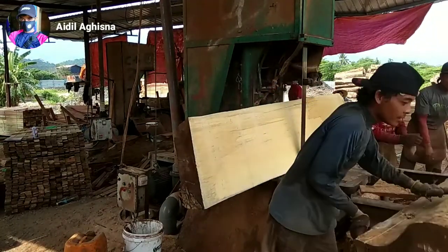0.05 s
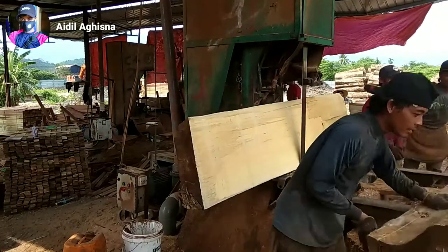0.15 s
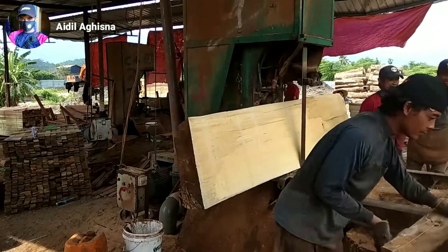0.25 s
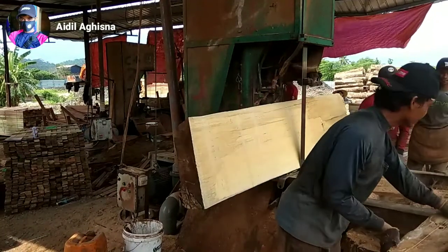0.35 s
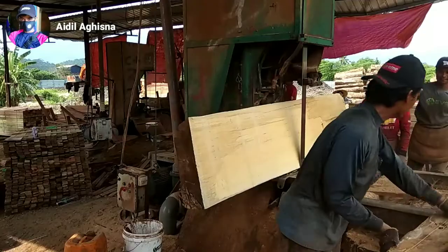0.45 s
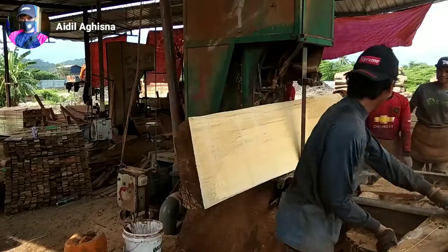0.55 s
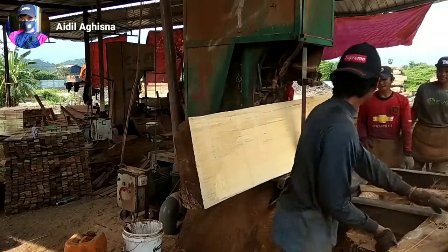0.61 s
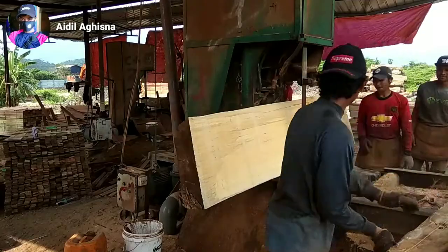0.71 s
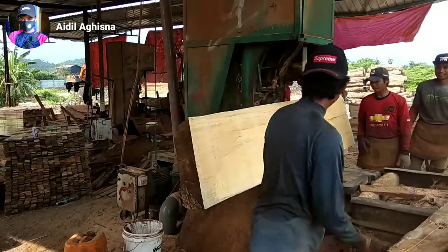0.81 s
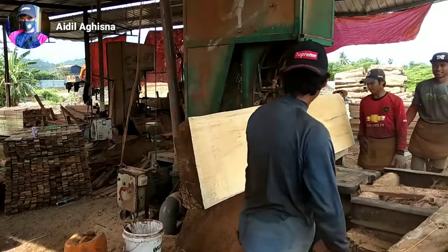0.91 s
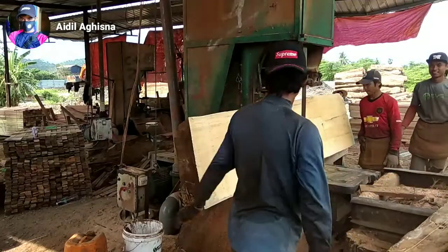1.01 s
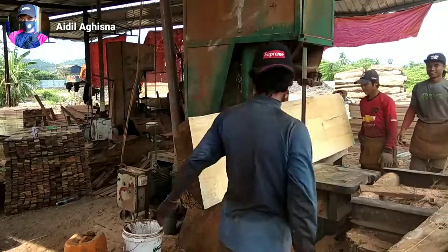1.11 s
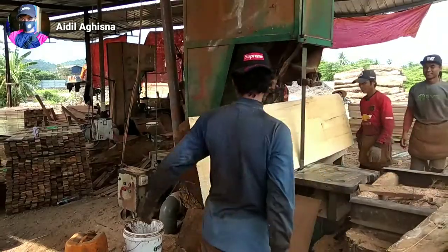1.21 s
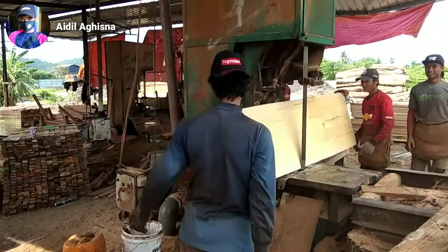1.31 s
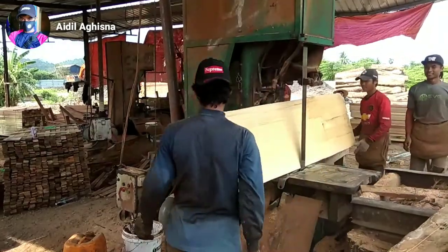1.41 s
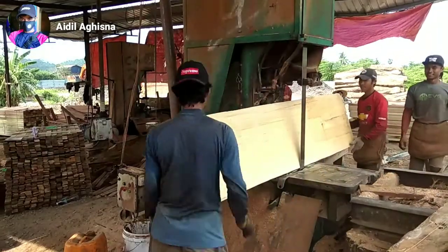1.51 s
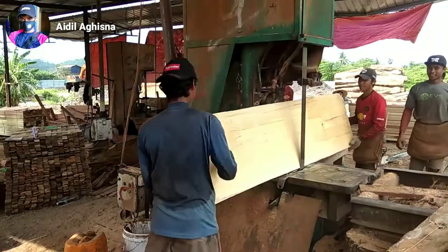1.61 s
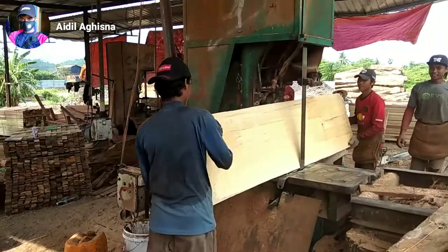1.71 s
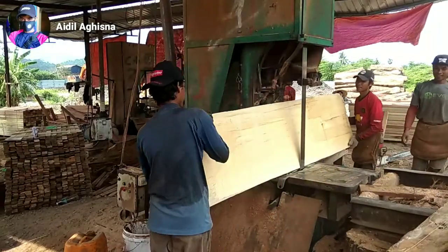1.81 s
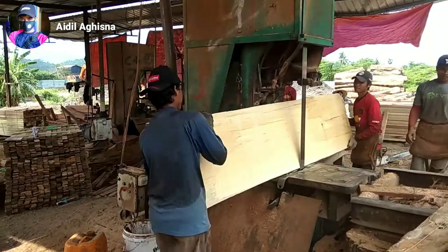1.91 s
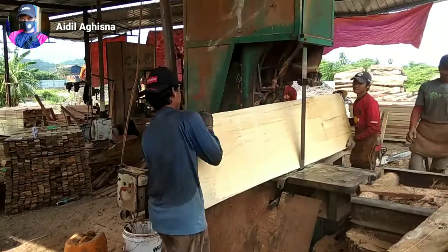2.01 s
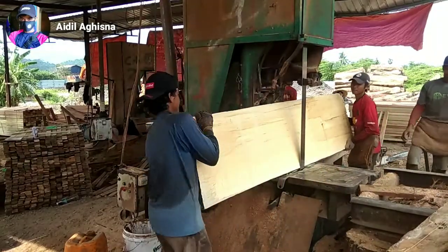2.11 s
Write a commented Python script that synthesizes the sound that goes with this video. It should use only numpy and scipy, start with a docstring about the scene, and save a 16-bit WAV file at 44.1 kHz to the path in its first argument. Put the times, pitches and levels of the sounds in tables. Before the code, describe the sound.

A heavy, muffled thud of a thick board landing and rocking, just after a light wooden knock and brief edge scrape; short shed echo, then faint steady hum, airy hiss and thin squeaks, picked up by a modest microphone.

```python
"""Board landing in a humming sawmill shed

A machine hums near one pitch (sine plus octave) over a faint rush of air and a high hiss (shaped noise).
A board's end knocks lightly; then a thick board drags an edge (noise), thuds and rocks (decaying modes).
Wall echoes and a diffuse shed tail answer the wood. Thin squeaks (wandering sines) come and go, then very
faint high sine tones near 14 kHz. The recorder's gain ducks under loud peaks."""
import sys
import numpy as np
from scipy import signal
from scipy.fft import rfft, irfft, next_fast_len
from scipy.io import wavfile
from scipy.ndimage import uniform_filter1d, map_coordinates

SR = 44100
rng = np.random.default_rng(int(sys.argv[2]) if len(sys.argv) > 2 else 0)


def int16_out(signal):
    """Quantize to a 16-bit WAV file."""
    q = np.round(np.clip(np.atleast_2d(signal).T, -1, 1) * 32767)
    wavfile.write(sys.argv[1], SR, q.astype(np.int16))


N = 97020
TIME_S = np.arange(N) / SR


def amp(db):
    """Decibels to gain."""
    return 10 ** (np.asarray(db) / 20)


def unit(x):
    """Scale to rms 1."""
    return x / np.sqrt(np.mean(x ** 2) + 1e-20)


def along(points, hz):
    """Interpolate (frequency, value) points on a log-frequency axis."""
    point_hz, value = np.transpose(points)
    return np.interp(np.log(hz + 1), np.log(point_hz + 1), value)


def wobble(knots_per_s):
    """Smooth random curve: a spline through normal random knots."""
    knots = rng.standard_normal(int(N * knots_per_s / SR) + 4)
    return map_coordinates(knots, [TIME_S * knots_per_s])


def filtered(x, response):
    """Multiply the spectrum of x by a response of frequency."""
    size = next_fast_len(N + SR // 2)
    spectrum = rfft(x, size) * response(np.fft.rfftfreq(size, 1 / SR))
    return irfft(spectrum, size)[..., :N]


def stereo(mid, side):
    """Left and right from mid and side."""
    return np.array([mid + side, mid - side])


def decay(t, t60_s):
    """Exponential decay, 60 dB down at t60_s."""
    return np.exp(-np.log(1000) * t / t60_s)


# hum level: time_s, level_db
HUM_LEVEL = [(0, -59), (.8, -59), (1.2, -59.5), (1.45, -62.5), (2.2, -62.5)]
HUM_HZ, HUM_DRIFT_HZ, HUM_FLUTTER_DB = 418.4, 0.25, 0.2
OCTAVE_DB, HUM_SIDE_DB = -14, -16.5


def hum():
    """Machine tone with a weak octave; slight pitch drift and level flutter, quadrature side signal."""
    phase = 2 * np.pi * np.cumsum(HUM_HZ + HUM_DRIFT_HZ * wobble(4.13)) / SR
    level_db = np.interp(TIME_S, *np.transpose(HUM_LEVEL)) + HUM_FLUTTER_DB * wobble(11.95)
    mid = np.sin(phase) + amp(OCTAVE_DB) * np.sin(2 * phase)
    side = amp(HUM_SIDE_DB) * np.cos(phase)
    return amp(level_db) * np.sqrt(2) * stereo(mid, side)


# left-right likeness of the noise: frequency_hz, correlation
LIKENESS = [(40, 0.034), (300, 0.53), (1200, 0.48), (3000, 0.23), (8000, -0.26), (13000, 0.045)]


def rush(spectrum, patchy_db):
    """Stereo noise, rms 1: random gain patches in time and frequency, then spectrum and width."""
    z = signal.stft(rng.standard_normal((2, N)), nperseg=512)[2]
    patches = uniform_filter1d(rng.standard_normal(z.shape[1:]), size=5, axis=0)
    patches = uniform_filter1d(patches, size=10, axis=1)
    pair = signal.istft(z * amp(patchy_db * unit(patches)), nperseg=512)[1][:, :N]

    def mid_side_response(hz):
        angle = np.arccos(np.clip(along(LIKENESS, hz), -1, 1)) / 2
        return amp(along(spectrum, hz)) * [np.cos(angle), np.sin(angle)]

    return unit(stereo(*filtered(pair, mid_side_response)))


# air spectrum: frequency_hz, relative_density_db
AIR_SPECTRUM = [(25, -5), (68, 3.5), (130, -6), (230, -7), (320, -7), (480, -11), (700, -8), (900, -13),
                (1080, -1.5), (1500, -8.5), (2000, -10.5), (3200, -10), (4500, -16.5), (7000, -42)]
AIR_DB = -57


def air():
    """Faint broadband rush, lightly patchy."""
    return amp(AIR_DB) * rush(AIR_SPECTRUM, patchy_db=1)


# hiss spectrum: frequency_hz, relative_density_db
HISS_SPECTRUM = [(3000, -55), (4600, -18), (5400, -8.5), (7000, -9.5), (8600, -4.5), (10200, 1),
                 (12500, 0.5), (14500, -3.5), (15500, -9.5)]
HISS_DB = -49


def hiss():
    """High noise with stronger patches."""
    return amp(HISS_DB) * rush(HISS_SPECTRUM, patchy_db=2.46)


PIVOT_HZ, BUILD_CYCLES = 281, 0.85  # brightness tilt centre; build-up of each mode


def strike(modes, start_s, bright_db_per_octave):
    """One soft contact: each mode builds up over about a cycle and dies at its own rate."""
    t = np.maximum(TIME_S - start_s, 0)
    out = np.zeros(N)
    for hz, level_db, t60_s in modes:
        gain = amp(level_db + bright_db_per_octave * np.log2(hz / PIVOT_HZ))
        build = 1 - np.exp(-(t * hz / BUILD_CYCLES) ** 2)
        out += gain * decay(t, t60_s) * build * np.sin(2 * np.pi * hz * t)
    return out


# modes of the board's end: frequency_hz, relative_level_db, t60_s
END_MODES = [(574, -14, 0.033), (641, 1, 0.056), (675, -17, 0.017)]
# knock and rebounds: start_s, relative_level_db
END_KNOCKS = [(0.0, -38), (.028, -44), (.062, -46), (.11, -51)]


def knock():
    """A board's end knocks and rebounds, ringing its modes at each contact."""
    return sum(amp(level_db) * strike(END_MODES, start_s, 0) for start_s, level_db in END_KNOCKS)


# side echo colour: frequency_hz, gain_db
ECHO_COLOUR = [(70, -20), (150, -6), (300, 1), (700, 7)]
WALL_COUNT, WALL_SPREAD_S, WALL_DB = 10, 0.035, -8.5


def walls(x):
    """Early echoes off machines and timber stacks: side-only delays of alternating sign."""
    delays_s = rng.uniform(0, WALL_SPREAD_S, WALL_COUNT)

    def response(hz):
        echoes = sum((-1) ** k * np.exp(-2j * np.pi * hz * d) for k, d in enumerate(delays_s))
        return amp(along(ECHO_COLOUR, hz)) * echoes

    return stereo(0, amp(WALL_DB) * filtered(x, response) / np.sqrt(WALL_COUNT))


# shed decay: frequency_hz, t60_s
SHED_DECAY = [(80, 0.36), (200, 0.47), (400, .5), (750, 0.7)]
# shed tail colour: frequency_hz, gain_db
TAIL_COLOUR = [(60, 6), (100, 0), (145, -8.5), (220, 3.5), (330, -5.5), (420, 11.5), (500, 0), (590, 0.5),
               (680, -5.5), (780, 4)]
SHED_DB, SHED_DELAY_S, SHED_WIDTH_DB = -9.5, 0.018, -5.5


def shed(x):
    """Diffuse shed answer: convolution with noise whose decay depends on frequency."""
    hz, t, z = signal.stft(rng.standard_normal((2, SR)), SR, nperseg=512)
    tail = signal.istft(z * decay(t, along(SHED_DECAY, hz)[:, None]), SR, nperseg=512)[1]
    tail = tail / np.linalg.norm(tail[0])
    mid, side = signal.fftconvolve(x[None], tail, axes=1)[:, :N]

    def response(hz):
        return amp(along(TAIL_COLOUR, hz)) * np.exp(-2j * np.pi * hz * SHED_DELAY_S)

    return amp(SHED_DB) * filtered(stereo(mid, amp(SHED_WIDTH_DB) * side), response)


# scrape spectrum at its start: frequency_hz, relative_density_db
SCRAPE_SPECTRUM = [(300, -40), (470, -18), (530, 9.5), (610, -1.5), (680, -2.5), (760, -50), (850, -49)]
SCRAPE_START_S, SCRAPE_RISE_S, SCRAPE_END_S, SCRAPE_FALL_S = 0.194, 0.01, 0.26, 0.012
SCRAPE_DB, SCRAPE_CLIMB_RATIO = -25.5, 1.176


def scrape():
    """Rough edge drags over its support: band noise crossfades to a higher copy of its spectrum."""
    rise = np.clip((TIME_S - SCRAPE_START_S) / SCRAPE_RISE_S, 0, 1)
    fall = np.exp(-np.maximum(TIME_S - SCRAPE_END_S, 0) / SCRAPE_FALL_S)

    def band(ratio):
        noise = rng.standard_normal(N)
        return unit(filtered(noise, lambda hz: amp(along(SCRAPE_SPECTRUM, hz / ratio))))

    low, high = band(1), band(SCRAPE_CLIMB_RATIO)
    angle = np.interp(TIME_S, [SCRAPE_START_S, SCRAPE_END_S], [0, np.pi / 2])
    return amp(SCRAPE_DB) * rise * fall * (np.cos(angle) * low + np.sin(angle) * high)


# modes of the thick board: frequency_hz, relative_level_db, t60_s
BOARD_MODES = [(103.3, -21.5, 0.45), (133.5, -2.5, 0.14), (158.1, 0.5, 0.17), (270.5, -13.5, 0.19),
               (335.9, -4, 0.21), (409, -3, 0.038), (497.3, -14.5, 0.054), (621, -7.5, 0.028),
               (672.5, -21.5, 0.057), (765, -29.5, 0.083)]
# contacts: start_s, relative_level_db, brightness_db_per_octave
BOARD_CONTACTS = [(.1975, -37, -16.5), (0.2047, -9.5, -0.5), (.2128, -8, -4), (.2231, -13.5, 6),
                  (0.2352, -17, 5), (0.2504, -26.5, 16), (0.2599, -22, 9), (0.282, -19, 5.5),
                  (0.2979, -29.5, -3)]


def thud():
    """Thick board touches with an edge, lands and rocks: each contact rings its modes."""
    return sum(amp(level_db) * strike(BOARD_MODES, start_s, bright)
               for start_s, level_db, bright in BOARD_CONTACTS)


TONE_RISE_S, TONE_WANDER_HZ = 0.0076, 50.2


def wandering_tone(start_s, pitch_hz, level_db, fade_s):
    """Sine with quick rise and Gaussian fade, pitch wandering separately left and right."""
    t = np.maximum(TIME_S - start_s, 0)
    hz = pitch_hz + TONE_WANDER_HZ * np.array([wobble(250), wobble(250)])
    tone = np.sin(2 * np.pi * np.cumsum(hz, axis=1) / SR)
    envelope = np.minimum(t / TONE_RISE_S, 1) * np.exp(-(t / fade_s) ** 2)
    return amp(level_db) * np.sqrt(2) * envelope * tone


# short tones, squeaks below SPLIT_HZ and faint high sines above: start_s, pitch_hz, level_db, fade_s
SHORT_TONES = [(0.942, 7700, -53.5, 0.054), (1.027, 7985, -54, 0.16), (1.045, 7975, -45, 0.033),
               (1.167, 6830, -55.5, 0.022), (1.546, 14100, -52, .04), (1.64, 14660, -55, 0.1)]
SPLIT_HZ = 10000


def squeaks():
    """Thin squeaks near 7 to 8 kHz, each a wandering tone."""
    return sum(wandering_tone(*row) for row in SHORT_TONES if row[1] < SPLIT_HZ)


def faint_high_tones():
    """Very faint high sine tones near 14 kHz."""
    return sum(wandering_tone(*row) for row in SHORT_TONES if row[1] >= SPLIT_HZ)


DULL_HZ = 795


def scene():
    """Wood with its echoes, steeply low-passed at DULL_HZ, over hum, high tones, air and hiss."""
    wood = thud() + scrape() + knock()
    in_shed = wood + walls(wood) + shed(wood)
    dull = filtered(in_shed, lambda hz: 1 / np.sqrt(1 + (hz / DULL_HZ) ** 40))
    return dull + hum() + squeaks() + faint_high_tones() + air() + hiss()


THRESHOLD_DB, CUT_DB_PER_DB, RELEASE_S = -24.5, 0.24, 0.02
TOP_HZ = 15550


def record(dry):
    """Gain control: peak excess in dB is held, decays, is smoothed and cuts both channels; band limit."""
    peak_db = 20 * np.log10(np.abs(dry).max(axis=0) + 1e-9)
    over_db = np.maximum(peak_db - THRESHOLD_DB, 0)
    fade = np.exp(-TIME_S / RELEASE_S)
    held_db = np.maximum.accumulate(over_db / fade) * fade
    smooth_db = uniform_filter1d(uniform_filter1d(held_db, size=400), size=400)
    return filtered(dry * amp(-CUT_DB_PER_DB * smooth_db), lambda hz: hz < TOP_HZ)


dry = scene()
out = record(dry)
int16_out(out)
```